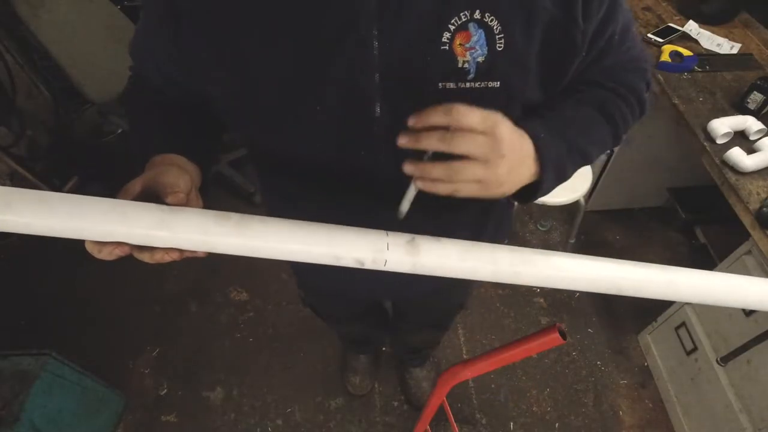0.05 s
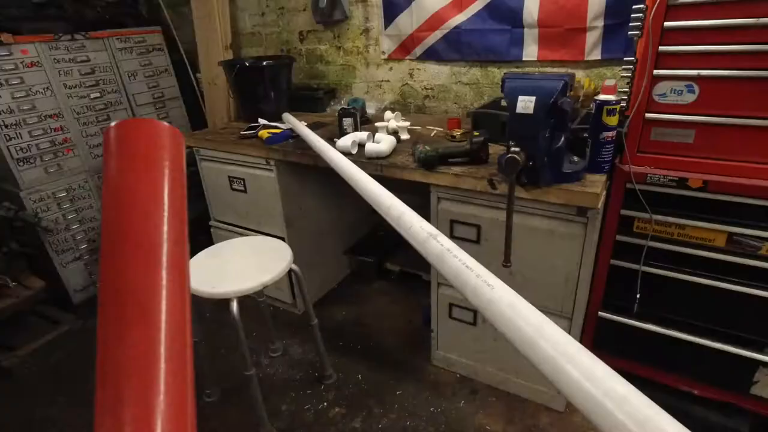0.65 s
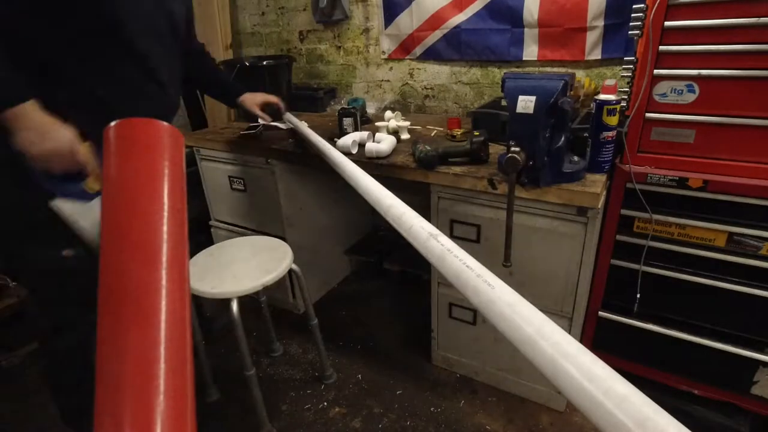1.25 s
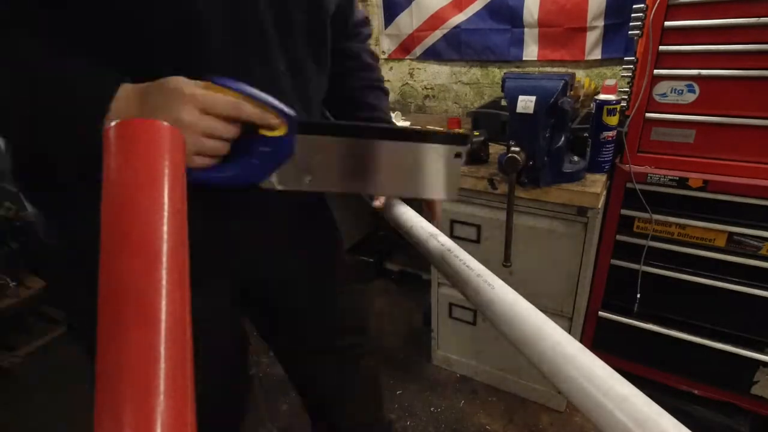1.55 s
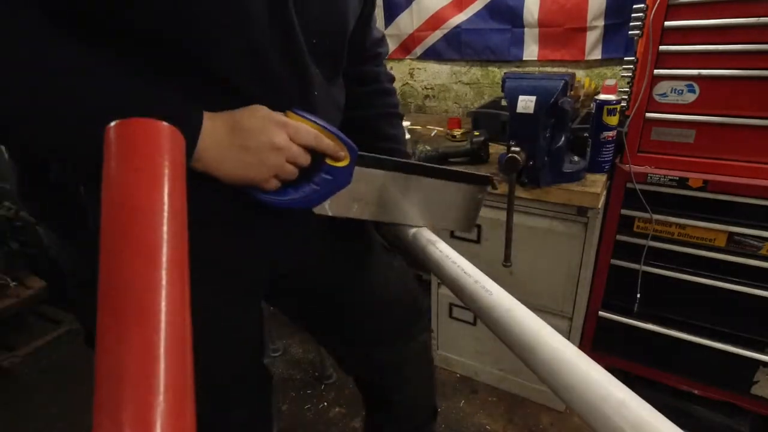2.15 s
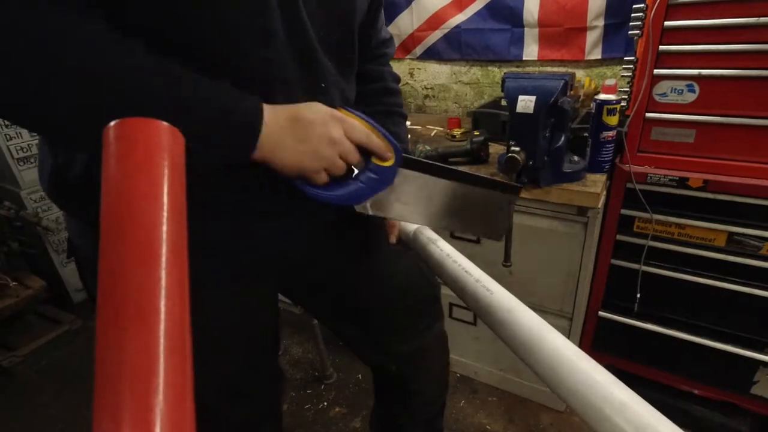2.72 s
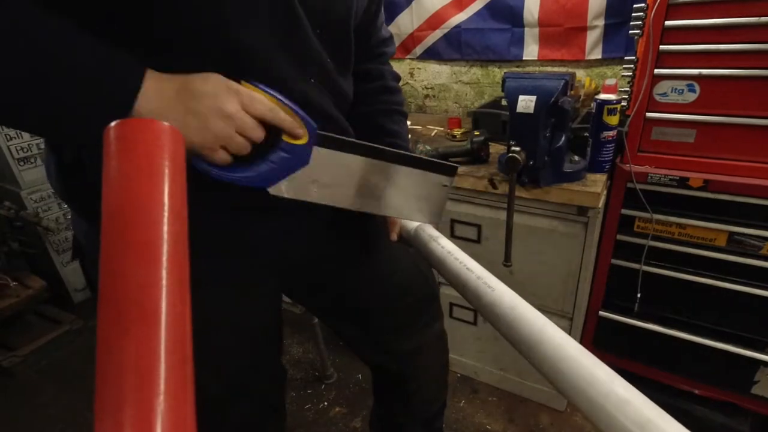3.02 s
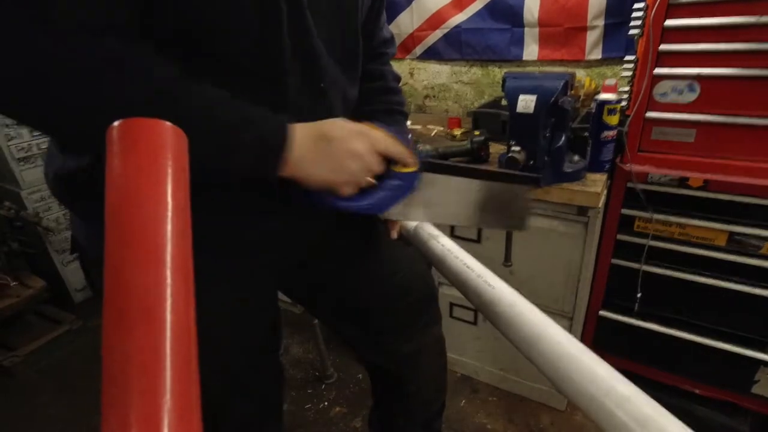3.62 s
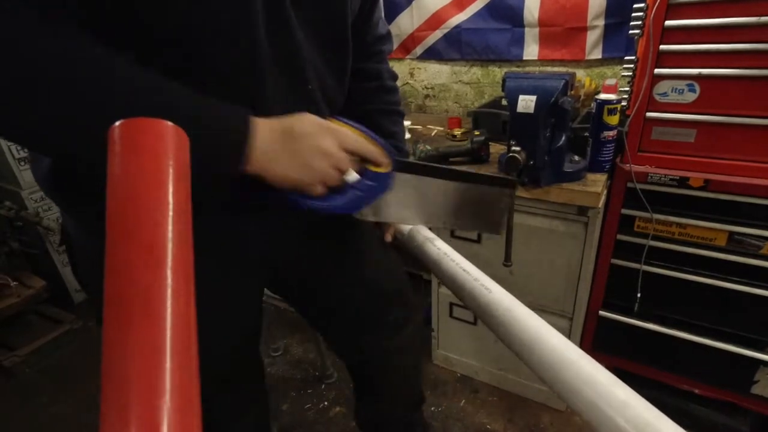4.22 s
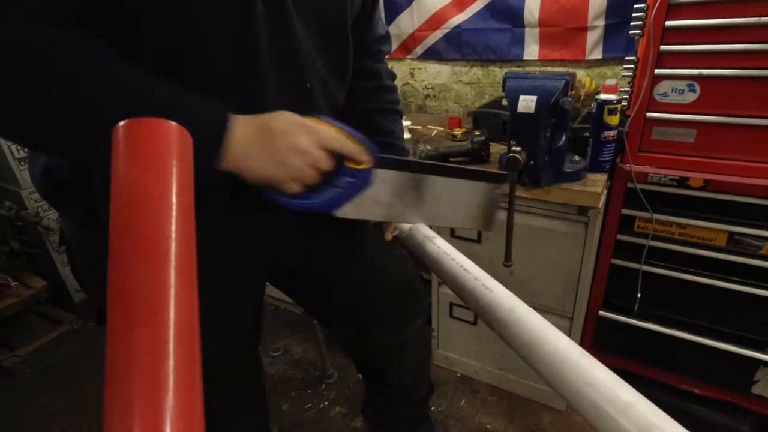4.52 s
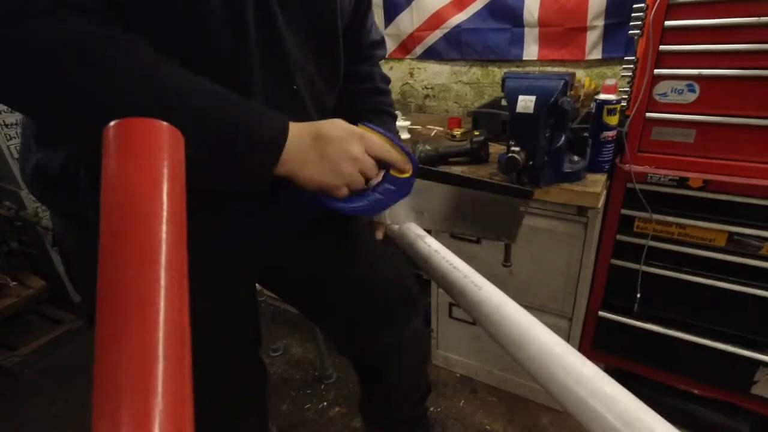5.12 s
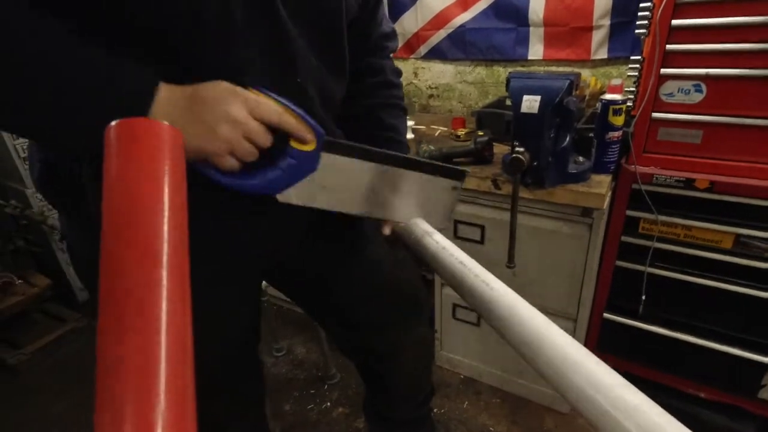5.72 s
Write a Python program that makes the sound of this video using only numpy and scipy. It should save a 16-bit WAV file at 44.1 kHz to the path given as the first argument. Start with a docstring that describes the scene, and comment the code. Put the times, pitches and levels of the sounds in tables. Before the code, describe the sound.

A faint low room rush opens the scene in a small workshop. From about 0.7 seconds, a hand saw is picked up from a bench: a short clatter near 0.8, gritty steel scrapes around 1.1, and more knocks around 1.6, with faint sleeve rustle. The blade slides lightly onto a plastic pipe, and at about 2.3 seconds close, louder sawing begins. The strokes are short and rapid, about eight back-and-forth cycles a second, with a bright, hissing rasp and a slightly hollow tone. The blade judders during the first strokes, and the pipe hums and booms softly beneath. The cutting is strongest around 4.5 seconds, with a thin squeak near 4.9 and sharp clicks near 5.0 and 5.4. After a brief hitch at 5.6 come a click, another squeak and the last strokes, up to about 6 seconds.

```python
"""Hand-sawing a plastic pipe

In a small workshop a saw is picked off a bench with a few knocks and scrapes, then set on a pipe.
It cuts in short quick strokes: the teeth tick faster at mid-stroke and tear off chips, exciting the
resonances of blade and pipe. Now and then stick-slip friction makes the blade chatter, and the
hand-held pipe booms softly. Signals are (mid, side) pairs until they are spread to left and right."""
import sys
import numpy as np
from scipy import signal
from scipy.fft import rfft, irfft
from scipy.io import wavfile
from scipy.ndimage import uniform_filter1d

SR = 44100
rng = np.random.default_rng(int(sys.argv[2]) if len(sys.argv) > 2 else 0)


def store_pcm(level_fs):
    """Save levels as 16-bit WAV."""
    pcm = np.round(np.clip(level_fs, -1, 1) * 32767).astype(np.int16)
    wavfile.write(sys.argv[1], SR, np.atleast_2d(pcm).T)


N = 263277
TIME, FREQ = np.arange(N) / SR, np.fft.rfftfreq(8192, 1 / SR)
CENTRE = np.array([[1], [0]])  # all mid, no side
BAND_LIMIT_HZ = 15900
CYCLE_S, PULL_S = .124, .064  # a typical push and pull together; every pull

# cycles of the saw: (start [s], push level [dB], pull level [dB])
STROKES = [(2.274, -43, -43), (2.455, -36.5, -40.5), (2.571, -35.5, -40.5), (2.695, -38, -39),
           (2.817, -34, -40.5), (2.943, -35, -40), (3.069, -36, -41.5), (3.201, -35, -39),
           (3.326, -34.5, -36), (3.446, -34.5, -40.5), (3.578, -36, -40), (3.709, -34, -42),
           (3.838, -36.5, -41.5), (3.966, -34.5, -40), (4.095, -34, -37.5), (4.222, -33, -36.5),
           (4.344, -32.5, -39), (4.469, -34, -36.5), (4.595, -32, -35.5), (4.719, -34, -40.5),
           (4.849, -33.5, -38.5), (4.975, -35, -38), (5.102, -35.5, -39.5), (5.23, -36, -39),
           (5.355, -36, -40), (5.484, -35.5, -39.5), (5.62, -52.5, -69), (5.737, -38.5, -40),
           (5.9, -31.5, -51)]
# resonances of pipe and blade: (frequency [Hz], width [Hz], lift [dB])
SAW_MODES = [(538.0, 202.4, 9.1), (753.0, 78.2, 4.6), (990.0, 75.9, 4.1), (1313.0, 222.0, 4.9),
             (1658.0, 218.5, 4.0), (2347.0, 73.6, 1.4), (2519.0, 180.5, 3.3), (3423.0, 117.3, 5.7),
             (3875.0, 177.1, 5.0), (4414.0, 222.0, 4.3), (4931.0, 219.6, 6.6), (5211.0, 138.0, 5.7),
             (5447.0, 179.4, 1.4), (6158.0, 219.6, 4.8), (6610.0, 100.0, 7.0), (6869.0, 200.0, 8.6),
             (7579.0, 222.0, 7.3), (7924.0, 171.4, 6.6), (8462.0, 150.6, 3.8), (8699.0, 118.4, 3.8),
             (9345.0, 186.3, 7.5), (9603.0, 135.7, 3.3), (9948.0, 105.8, 2.1), (10249.0, 212.7, 6.4),
             (10551.0, 222.0, 5.0), (11197.0, 222.0, 6.5), (11391.0, 74.8, 7.5), (11950.0, 208.2, 3.0),
             (13178.0, 222.0, 3.2), (14857.0, 222.0, 5.7)]
# resonances of a knock: (frequency [Hz], width [Hz], lift [dB])
KNOCK_MODES = [(560, 130, 6), (850, 160, 2), (1300, 200, 3), (1760, 140, 7), (2780, 220, 8), (4650, 500, 5)]


def gain_of(db):
    """Amplitude ratio of a level in decibels."""
    return 10 ** (np.asarray(db) / 20)


def unit_rms(x):
    """Normalisation to unit mean power."""
    return x / np.sqrt(np.mean(x ** 2) + 1e-20)


def spectrum(points, hz=FREQ):
    """Interpolation of a table on a log-frequency axis."""
    f, value = np.transpose(points)
    return np.interp(np.log(hz + 1), np.log(f + 1), value)


def curves(rows):
    """Linear interpolation of each column of a time table, sample by sample."""
    s, *columns = np.transpose(rows)
    return [np.interp(TIME, s, c) for c in columns]


def peaks_db(modes):
    """Modal response: one peak for each resonance."""
    return sum(db / (1 + (2 * (FREQ - hz) / width) ** 2) ** 2 for hz, width, db in modes)


def band_db(hz, half_width_hz):
    """Band-pass response, 6 dB down at half_width_hz from its centre."""
    return -20 * np.log10(1 + ((FREQ - hz) / half_width_hz) ** 2)


def crossover(db, hz):
    """Power-complementary parts of a spectrum, below and above hz."""
    ratio = (FREQ / hz) ** 8 + 1e-10
    return db - 10 * np.log10(1 + ratio), db - 10 * np.log10(1 + 1 / ratio)


def ring(x, db):
    """Minimum-phase filter of unit energy with the given spectral shape."""
    log_gain = np.log(gain_of(np.maximum(db, db.max() - 90)))
    mirrored = np.concatenate([log_gain, log_gain[-2:0:-1]])
    taps = np.fft.ifft(np.exp(np.conj(signal.hilbert(mirrored)))).real[:len(FREQ)]
    return signal.oaconvolve(x, taps[None] / np.linalg.norm(taps), axes=1)[:, :N]


def noise():
    """White noise, uncorrelated in mid and side."""
    return rng.standard_normal((2, N))


def waver(hz):
    """Random modulation: noise of unit rms, low-passed at hz."""
    rolloff = 1 + (np.fft.rfftfreq(N, 1 / SR) / hz) ** 4
    return unit_rms(irfft(rfft(rng.standard_normal(N)) / rolloff, N))


def grains(per_s, spread_db):
    """Shot noise: sparse clicks of uneven size."""
    size = gain_of(spread_db * np.minimum(rng.exponential(1, N), 4))
    return unit_rms(noise() * size * (rng.random(N) < per_s / SR))


def moving_contact(x, depth_db):
    """Spectral modulation: as the contact moves, patches of the spectrum flare and fade."""
    z = signal.stft(x, SR, nperseg=256, noverlap=192)[2]
    patches = uniform_filter1d(rng.standard_normal(z.shape[1:]), 3, axis=0)  # across frequency
    patches = uniform_filter1d(patches, 15, axis=1)  # across time
    flare = unit_rms(gain_of(depth_db * unit_rms(patches)))
    return signal.istft(z * flare, SR, nperseg=256, noverlap=192)[1][:, :N]


def spread(x, width):
    """Mid-side decoding: the side's gain sets the stereo width at each frequency."""
    mid, side = x
    side = irfft(rfft(side) * gain_of(spectrum(width, np.fft.rfftfreq(N, 1 / SR))), N)
    return np.array([mid + side, mid - side])


def room_tone(drone_hz=150, drone_db=-73.5, drone_end_s=.63):
    """Filtered noise: a faint low rush, at first with a narrow-band drone in it."""
    # spectrum of the rush: (frequency [Hz], level [dB])
    colour = [(20, -10), (60, 3.5), (90, -14), (150, -1), (260, -7), (450, -13), (1200, -19.5), (3000, -26),
              (7000, -31), (15000, -47)]
    # its level, which dips briefly: (time [s], level [dB])
    level = [(0, -72.5), (.628, -72), (.634, -102), (.67, -86), (.71, -81), (1.3, -70), (2.2, -70.5),
             (5.97, -85)]
    drone = ring(noise(), band_db(drone_hz, half_width_hz=26)) * (TIME < drone_end_s)
    rush = ring(noise(), spectrum(colour))
    return gain_of(curves(level)[0]) * rush + gain_of(drone_db) * drone


def workshop(x):
    """Reverberation: dense reflections decay exponentially, each band at its own rate."""
    # decay of the room: (frequency [Hz], reverberation time [s])
    t60 = [(200, 0.11), (1000, 0.11), (5000, 0.13), (15000, 0.038)]
    n = SR // 2
    reflections = rng.standard_normal((2, n)) * (rng.random((2, n)) < .1) * (TIME[:n] > .004)
    hz, t, z = signal.stft(reflections, SR, nperseg=256)
    tail = signal.istft(z * gain_of(-60 * t / spectrum(t60, hz)[:, None]), SR, nperseg=256)[1]
    return signal.fftconvolve(x, tail / np.linalg.norm(tail[0]), axes=1)[:, :N]


def rustle(level_db=-78, uneven_db=1.0, start_s=.7, end_s=2.25):
    """Friction noise of sleeves and low shuffling while the saw is fetched."""
    colour = spectrum([(30, 10), (90, 10), (200, -15), (500, 13), (2500, 2), (7000, -2.5), (15000, -8)])
    rubbing = noise() * gain_of(level_db + uneven_db * waver(36))
    return ring(rubbing * (TIME > start_s) * (TIME < end_s), colour)


def slides(fall_db=16):
    """Sliding friction: steel dragged lightly over the bench, then the pipe, gives a gritty hiss."""
    # slides, down by fall_db one swell before and one fade after the peak:
    # (peak time [s], swell [s], fade [s], level [dB], treble lift [dB])
    drags = [(1.075, 0.066, 0.072, -52, -2.5), (1.173, 0.043, 0.039, -47, 9.5),
             (1.325, 0.042, 0.073, -62, -5), (1.442, 0.038, 0.027, -57.5, 0.5),
             (1.65, 0.17, 0.062, -76, 11), (1.93, .08, 0.045, -76, 2), (2.179, 0.026, 0.049, -62, -1),
             (2.219, 0.021, 0.029, -56, 1.5)]
    body, treble = np.zeros((2, N))
    for s, swell, fade, db, treble_db in drags:
        away = np.maximum((s - TIME) / swell, (TIME - s) / fade)
        level = gain_of(db - fall_db * away ** 1.9)
        body += level
        treble += level * gain_of(treble_db)
    grit = unit_rms((noise() + 0.27 * grains(900, spread_db=3.0)) * gain_of(2.9 * waver(51)))
    colour = spectrum([(100, -16), (300, 9.5), (550, 5.5), (1200, 5.5), (1700, 10), (2300, 12),
                       (4300, 4), (6500, 10), (11000, 7), (15500, 4)])
    low, high = crossover(colour + .5 * peaks_db(SAW_MODES) + .5 * peaks_db(KNOCK_MODES), hz=4080)
    return moving_contact(ring(grit * body, low) + ring(grit * treble, high), depth_db=3.2)


def knocks(t60_s=0.034):
    """Impact excitation: a clatter of tiny contacts rings damped modes; harder contacts are brighter."""
    # knocks of saw, bench and pipe: (time [s], level [dB], clatter length [s], treble tilt [dB/octave])
    impacts = [(.714, -63, .0034, 18), (.806, -48.5, 0.016, -1), (.813, -45, 0.016, 0),
               (0.832, -37, 0.0028, 7), (.986, -52, 0.014, -15), (1.028, -52.5, 0.0053, -3),
               (1.295, -57, 0.0034, -14), (1.342, -55, 0.0045, 11), (1.521, -50, 0.0028, 3.5),
               (1.54, -45, 0.0089, -4), (1.598, -37, 0.015, 4), (1.669, -54, 0.011, -5),
               (1.833, -55, 0.002, 5), (4.982, -34, 0.0051, 23), (5.365, -32, 0.0052, 0.5),
               (5.726, -31, 0.0015, 16.5)]
    # spectral envelope of a knock: (frequency [Hz], level [dB])
    colour = [(60, -51), (200, -15.5), (330, 6.5), (600, 7), (1000, 8), (1800, 4.5), (3000, 3.5),
              (4500, 1.5), (9000, -8.5), (15500, -24)]
    out, t = np.zeros((2, N)), TIME[:SR // 5]
    octaves = np.log2(1 + (FREQ / 1300) ** 2) / 2
    for s, db, length, tilt_db in impacts:
        modes = np.array(KNOCK_MODES) * (1 + rng.standard_normal((len(KNOCK_MODES), 3)) * [.02, 0, .3])
        contacts = rng.standard_normal((2, len(t))) * gain_of(-60 * np.maximum(t - length, 0) / t60_s)
        knock = gain_of(db) * ring(contacts, spectrum(colour) + tilt_db * octaves + peaks_db(modes))
        span = out[:, round(s * SR):][:, :knock.shape[1]]
        span += knock[:, :span.shape[1]]
    return out


def pipe_boom(hz=191, half_width_hz=22, swell_s=0.021, boom_db=-1, shudder_db=-2):
    """Forced vibration: the shaken pipe hums at its low resonance over a dull shudder, and booms."""
    # steady shaking of the work: (time [s], relative hum level [dB], relative shudder level [dB])
    shaking = [(2.15, -76, -102), (2.35, -67, -74), (3.0, -65.5, -67.5), (3.35, -65.5, -65),
               (4.1, -59, -61.5), (4.7, -65.5, -65.5), (5.3, -63.5, -74), (5.97, -62, -64)]
    # the pipe rocks in the hand: (time [s], relative level [dB])
    booms = [(2.375, -49.5), (3.44, -55), (3.52, -52.5), (3.84, -49.5), (3.96, -55.5), (4.49, -57),
             (4.61, -56), (4.831, -56), (4.94, -58), (5.44, -59), (5.71, -55.5), (5.809, -52)]
    hum_db, shake_db = curves(shaking)
    swells = sum(gain_of(db) * np.exp(-((TIME - s) / swell_s) ** 2) for s, db in booms)
    cycles = np.cumsum(hz + .5 * half_width_hz * waver(19.2)) / SR
    note = np.sqrt(2) * np.cos(2 * np.pi * cycles) * CENTRE
    hum = ring(noise(), band_db(hz, half_width_hz)) * gain_of(hum_db)
    dull = spectrum([(15, -11), (50, -5.5), (85, -6), (120, -1.5), (230, -8), (1000, -86)])
    shudder = ring(noise(), dull) * gain_of(shake_db + shudder_db)
    return (gain_of(boom_db) * (hum + swells * note) + shudder) * (TIME > shaking[0][0])


def faint_squeaks(low_hz=1165, high_hz=2433, half_length_s=0.022, relative_db=-9):
    """Weak stick-slip: one event for chatter() in each push, at a random pitch."""
    return [(s + (CYCLE_S - PULL_S) * (0.28 + 0.22 * when), half_length_s,
             low_hz * (high_hz / low_hz) ** pitch, push_db + relative_db)
            for (s, push_db, _), (when, pitch) in zip(STROKES, rng.random((len(STROKES), 2)))]


def chatter(level_db=-1, db_per_octave=-9, wobble=0.0358, sag=0.0782, uneven_db=4.0):
    """Stick-slip oscillation of the blade: rough harmonic judders and squeaks that sink in pitch."""
    # bursts of slipping: (centre time [s], half-length [s], slip rate [Hz], relative level [dB])
    bursts = [(2.222, .025, 490, -50), (2.328, 0.053, 512, -43), (2.489, 0.037, 1320, -39.5),
              (2.493, 0.011, 474, -33.5), (2.59, .037, 557, -40), (2.723, 0.038, 541.3, -34),
              (2.964, .03, 567, -40), (3.098, .035, 590, -42.5), (3.302, 0.033, 742, -45.5),
              (3.594, 0.028, 576, -46.5), (3.723, 0.028, 524, -49), (3.742, 0.03, 1203, -49),
              (4.885, .025, 2323, -41), (4.944, 0.032, 2178, -41.5), (4.875, .022, 4720, -31),
              (5.815, 0.018, 2520, -35), (5.806, 0.044, 5190, -37), (5.819, .027, 745, -42)]
    out, drift = np.zeros(N), 1 + wobble * waver(127)
    for s, half_length, hz, db in bursts + faint_squeaks():
        active = abs(TIME - s) < half_length
        progress = (TIME[active] - s) / half_length
        cycles = np.cumsum(hz * drift[active] * (1 - sag * progress)) / SR
        buzz = sum(gain_of(db_per_octave * np.log2(k)) * np.cos(2 * np.pi * k * cycles)
                   for k in range(1, 7) if k * hz < BAND_LIMIT_HZ)
        out[active] += gain_of(db + level_db) * np.cos(np.pi * progress / 2) ** 2 * buzz
    out *= gain_of(uneven_db * waver(89))
    return np.array([out, 0.34 * signal.hilbert(out).imag])  # left and right out of step


def stroke_motion(skate_s=0.014, skate_db=5.5, catch_s=0.0058, snag_s=0.0042, kick_db=2.5, kick_s=0.004):
    """Reciprocating drive: in each stroke the blade skates briefly, catches, speeds up and slows."""
    # force of the arm in a push and in a pull: (share of the stroke [0-1], level [dB])
    push = [(0, -7.5), (.1, -1), (.25, 1), (.5, 1), (.7, 2), (.82, -0.5), (1, -21)]
    pull = [(0, -9), (.12, -6), (.33, -0.5), (.62, -3), (.8, -5.5), (1, -19)]
    # a tooth snags and tears free: (time [s], extra force [dB])
    snags = [(2.49, 8), (3.461, 3), (3.722, 9.5), (3.982, 5), (4.114, 8.5), (4.731, 17), (4.984, 10),
             (5.11, 0), (5.369, 12.5)]
    start, push_db, pull_db = np.transpose(STROKES)
    end = np.append(start[1:], start[-1] + CYCLE_S)
    turns = np.append(np.column_stack([start, end - PULL_S]), end[-1])
    count = np.interp(TIME, turns, np.arange(len(turns)))
    stroke, along = count.astype(int), count % 1
    pulling = stroke % 2
    since_catch = TIME - turns[stroke] - skate_s
    arm_db = np.where(pulling, np.interp(along, *np.transpose(pull)),
                      np.interp(along, *np.transpose(push)))
    caught_db = skate_db * .5 * np.tanh(since_catch / catch_s)
    # a slow push builds up by 199 dB for each second that it outlasts a pull
    build_db = 199 * (np.diff(turns)[stroke] - PULL_S) * (along - .5)
    snag_db = sum(db * (TIME > s) * np.exp(-abs(TIME - s) / snag_s) for s, db in snags)
    force = gain_of(arm_db + caught_db + build_db + snag_db) * (TIME > start[0])
    stroke_power = np.bincount(stroke, force ** 2) / np.maximum(np.bincount(stroke, force > 0), 1)
    force /= np.sqrt(stroke_power + 1e-12)[stroke]
    effort_db = np.column_stack([push_db, pull_db]).ravel()[stroke]
    blade_drive = uniform_filter1d(force * gain_of(effort_db), size=80)
    # the pipe jolts as each push catches, and follows force and effort only in part
    jolt_db = kick_db * (1 - pulling) * np.exp(-(since_catch / kick_s) ** 2)
    pipe_db = -44.5 + 0.53 * (effort_db + 35) + jolt_db  # a typical push is at -35 dB
    pipe_drive = uniform_filter1d(force ** 0.45 * gain_of(pipe_db), size=80)
    speed = np.sin(np.pi * along) ** .8
    return blade_drive, pipe_drive, speed, pulling


def hollow_resonance(x, pulling, hz=560, width_hz=260, push_db=1, pull_db=-5.5):
    """Resonance of the pipe: a push drives the band round its hollow note harder than a pull."""
    # the note fades unevenly as the cut deepens: (time [s], lift [dB])
    lift = [(2.3, 2), (2.8, 3.5), (3.3, -4.5), (4.0, 2.5), (4.8, -4), (5.5, -4), (5.97, -1.5)]
    band = signal.lfilter(*signal.iirpeak(hz, hz / width_hz, fs=SR), x)
    lift_db = curves(lift)[0] + np.where(pulling, pull_db, push_db)
    return x + (gain_of(lift_db) - 1) * band


def tooth_note(teeth, level_db=-9, patchy_db=5):
    """Periodic excitation: evenly biting teeth merge into a tone at the tooth-passing frequency."""
    note = unit_rms(np.cos(2 * np.pi * teeth) * gain_of(patchy_db * np.tanh(waver(25))))
    return gain_of(level_db) * note * CENTRE


def sawing(rub=0.95, chips=0.44, pipe_ticks=0.18, blade_ticks=0.23, pipe_db=0.5, blade_db=-0.68):
    """Source and filter: tooth ticks, puffs of tearing plastic and snapping chips ring pipe and blade."""
    # teeth passing at mid-stroke: (time [s], rate [Hz])
    tooth_rate = [(2.3, 1600), (2.6, 1913), (3.3, 1940), (4.0, 2102), (4.85, 2382), (5.97, 2135)]
    # spectral envelope of the cut: (frequency [Hz], level [dB])
    colour = [(100, -24.5), (280.0, -9), (450.0, -6), (800.0, -4), (1200.0, -2), (2000.0, -5),
              (2700.0, -1.6), (3150.0, -5), (4500.0, 0.5), (6500.0, 3), (8300.0, -0.5), (11000.0, 1),
              (13000.0, 3.5), (15600, -1)]
    blade_drive, pipe_drive, speed, pulling = stroke_motion()
    jitter = 1 + .015 * waver(150)
    teeth = np.cumsum(curves(tooth_rate)[0] * (.1 + .9 * speed) * jitter) / SR
    tick = np.diff(np.floor(teeth), prepend=0)
    tick = unit_rms(tick - uniform_filter1d(tick, size=100)) * CENTRE
    puffs = np.exp(-(teeth % 1) / 0.11)  # each dies early in its tooth's period
    tearing = unit_rms(unit_rms((rub + puffs) * noise()) + chips * grains(2500, spread_db=-3))
    grip = gain_of(1.18 * waver(52))
    low, high = crossover(spectrum(colour) + peaks_db(SAW_MODES), hz=2970)
    pipe = ring(unit_rms(grip * (tearing + pipe_ticks * tick)) * pipe_drive, low)
    pipe += tooth_note(teeth) * pipe_drive * speed
    blade = ring(unit_rms(grip * (tearing + blade_ticks * tick)) * blade_drive, high)
    cut = gain_of(pipe_db) * hollow_resonance(pipe, pulling) + gain_of(blade_db) * blade
    return moving_contact(cut, depth_db=3.0)


def scene(saw_room_db=-15.5, bench_room_db=-11):
    """Direct and reverberant sound: the cut is close and wide, the bench farther off and narrower."""
    # stereo width of sawing, handling and room tone: (frequency [Hz], side gain [dB])
    saw_width = [(60, 2), (190, -11), (340, 5.5), (440, -3), (550, -6), (780, -8.5), (1170, 1),
                 (1650, -9.5), (1900, 0.5), (2650, -29.5), (3500, -10.5), (4200, -10), (5600, -4.5),
                 (6200, 2), (9800, -3), (15000, -4)]
    bench_width = [(60, -10), (150, -12), (380, -28.5), (950, -30.5), (2380, -21.5), (5980, -7),
                   (15000, -0.5)]
    room_width = [(60, -11), (180, -12), (550, -4), (1650, -3), (4970, -0.5), (15000, -1)]
    bumps, cutting = knocks(), TIME > STROKES[0][0]
    near = sawing() + chatter() + bumps * cutting
    far = slides() + rustle() + bumps * ~cutting
    saw = near + gain_of(saw_room_db) * workshop(near) + pipe_boom()
    bench = far + gain_of(bench_room_db) * workshop(far)
    return spread(saw, saw_width) + spread(bench, bench_width) + spread(room_tone(), room_width)


def record(dry):
    """Band limiting by a linear-phase low-pass filter."""
    taps = signal.firwin(511, BAND_LIMIT_HZ, window=("kaiser", 9), fs=SR)
    return signal.oaconvolve(dry, taps[None], "same")


dry = scene()
out = record(dry)
store_pcm(out)
```